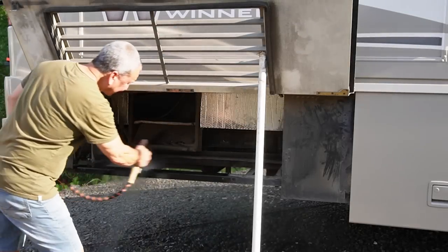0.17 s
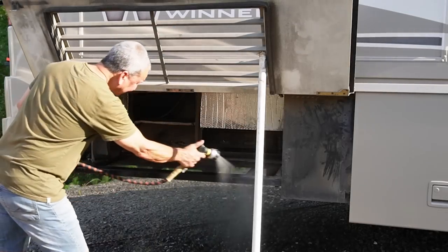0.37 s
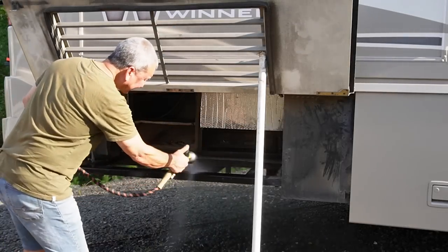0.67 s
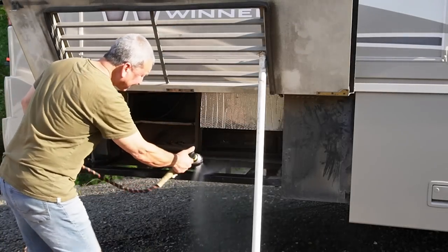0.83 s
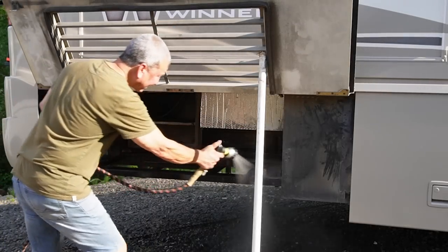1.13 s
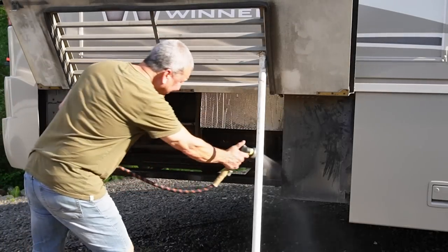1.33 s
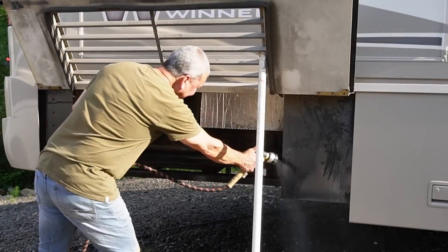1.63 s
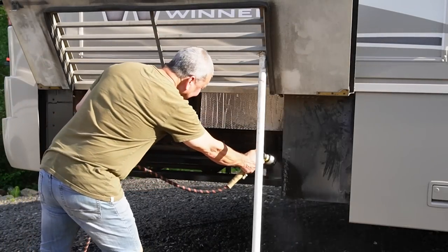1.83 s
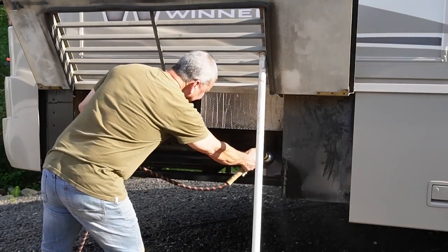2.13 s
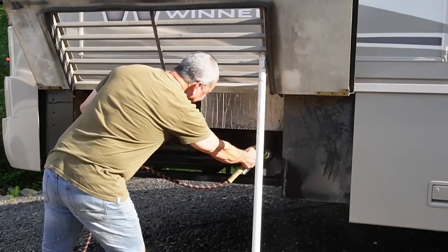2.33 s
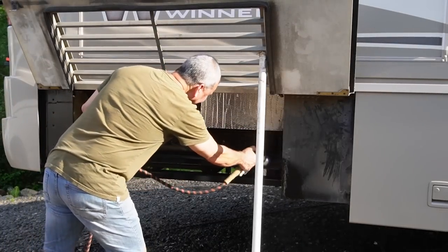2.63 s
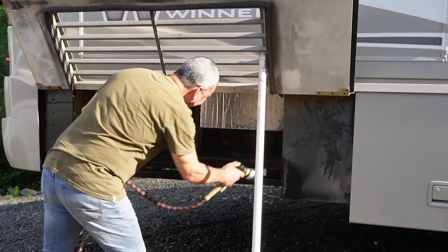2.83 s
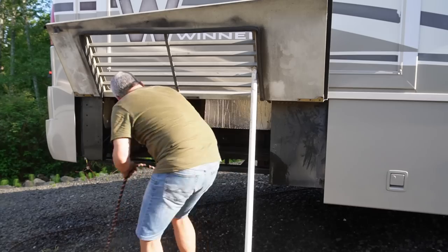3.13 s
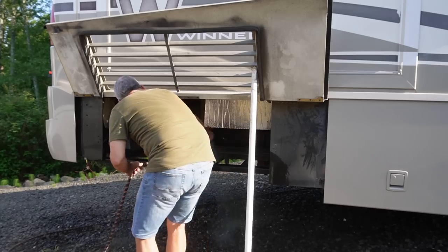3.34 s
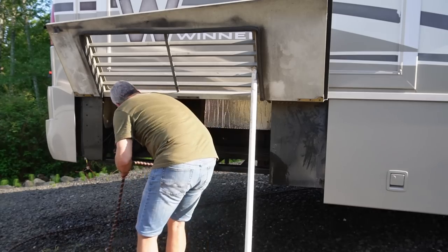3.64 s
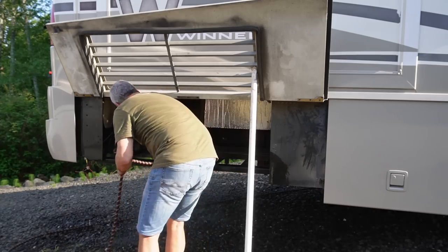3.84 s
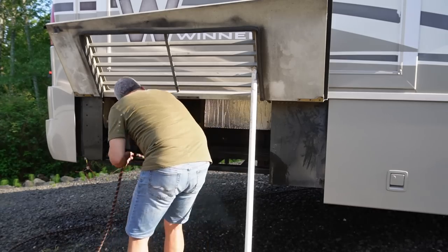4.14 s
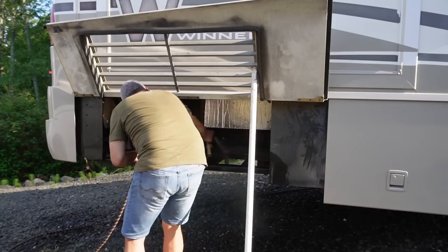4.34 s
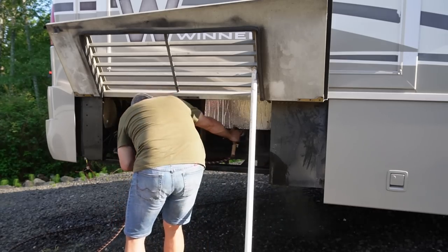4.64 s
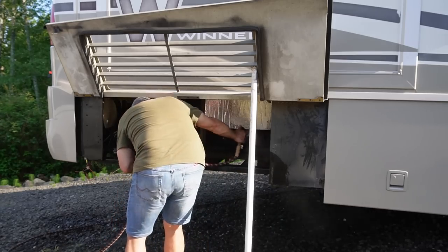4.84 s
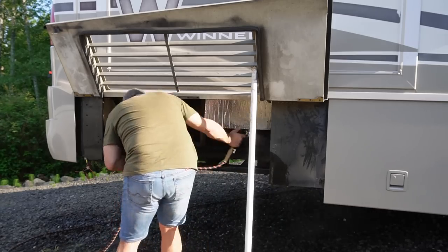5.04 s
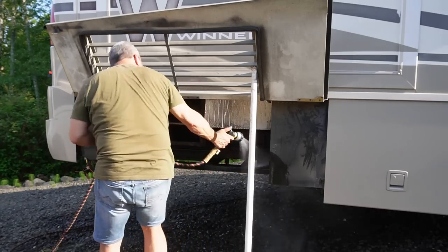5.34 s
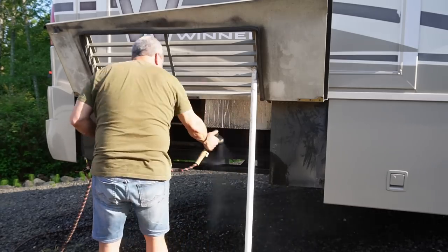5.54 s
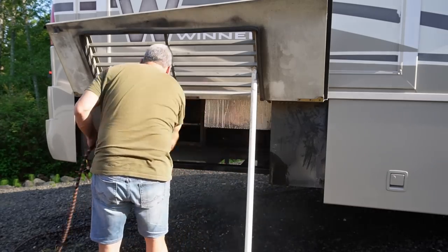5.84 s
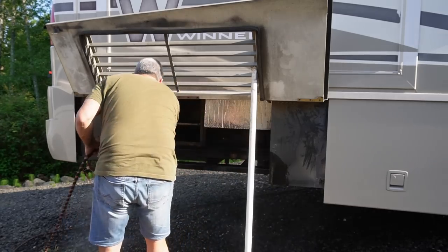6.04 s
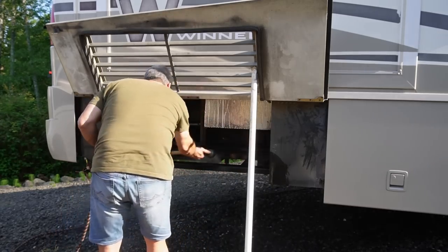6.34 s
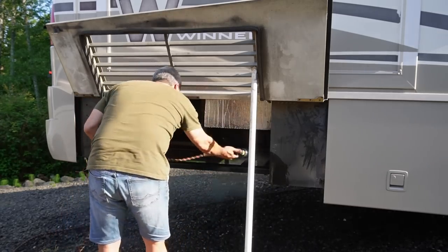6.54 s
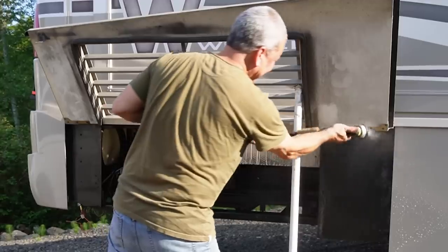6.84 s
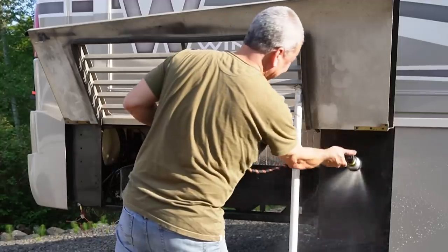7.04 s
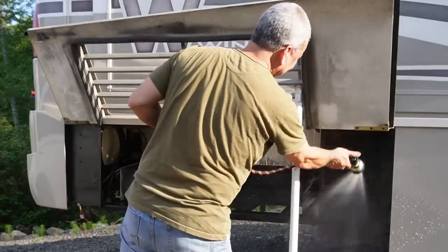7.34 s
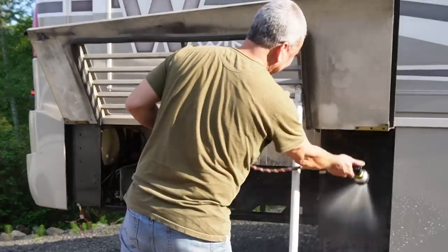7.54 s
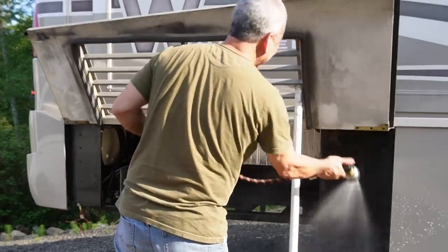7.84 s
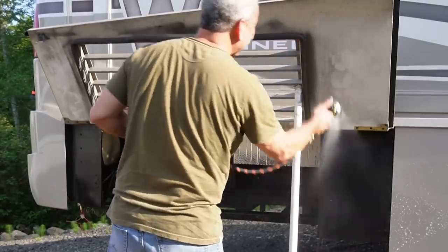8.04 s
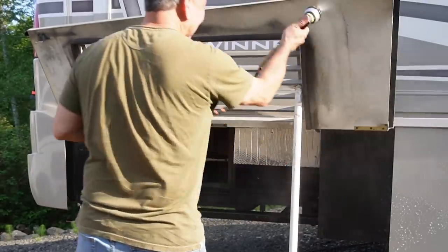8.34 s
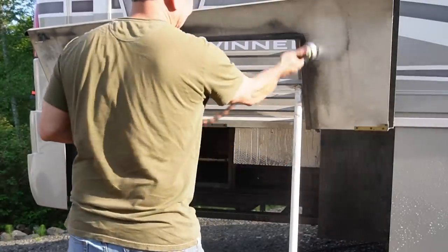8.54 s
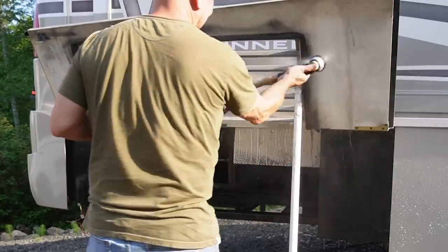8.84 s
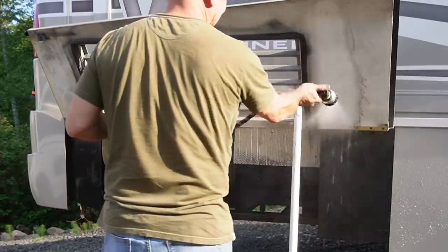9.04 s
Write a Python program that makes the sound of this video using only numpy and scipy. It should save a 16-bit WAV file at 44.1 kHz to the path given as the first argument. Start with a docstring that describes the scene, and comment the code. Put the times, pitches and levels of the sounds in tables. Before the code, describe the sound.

Outdoors, dense water spray pelts hollow metal, pauses for a short patter, restarts more softly, then drums on outer panels with a hoarse, close whistle.

```python
"""A garden hose sprays into the open metal compartment of a parked vehicle, outdoors, under a buffeting wind.
First, a dense rain of droplets drums, splashes and hisses on the walls, with a few slaps off an edge.
The trigger is let go: the metal rings on faintly and the last water spatters, then the spray starts again.
Thin whistles come and go inside as the wind eases; then the jet drums on the outer panels,
whistles hoarsely in passing and at last loudly, held close. A faint outdoor hush lies under it all."""
import sys
import numpy as np
from scipy import signal
from scipy.fft import rfft, irfft, next_fast_len
from scipy.io import wavfile
from scipy.ndimage import uniform_filter1d

SR = 44100
rng = np.random.default_rng(int(sys.argv[2]) if len(sys.argv) > 2 else 0)


def pcm_store(signal):
    """Save signal as 16-bit PCM."""
    levels = np.round(np.clip(np.atleast_2d(signal), -1, 1) * 32767)
    wavfile.write(sys.argv[1], SR, levels.astype(np.int16).T)


N = 405279
TOP_HZ = 15850  # upper edge of the sound
TIME = np.arange(N) / SR  # s
SIZE = next_fast_len(N + 8192, real=True)  # transform length, with room for filter tails
FREQ = np.maximum(np.arange(SIZE // 2 + 1) * SR / SIZE, 1)  # Hz

# how hard the jet strikes, first and second squeeze, before sputter and trigger: start_s, force_db
FIRST = [(0.0, -36), (0.56, -37.5), (0.84, -36.5), (1.41, -36.5), (1.42, -35.5), (2.43, -35.5),
         (2.64, -38.5)]
SECOND = [(3.29, -43), (3.68, -38.5), (3.85, -42), (3.93, -40.5), (5.11, -40), (5.14, -39), (5.84, -38.5),
          (5.95, -43.5), (6.64, -39), (6.89, -29.5), (6.92, -34), (7.02, -33.5), (8.28, -35), (8.32, -32),
          (8.84, -29.5), (9.19, -35)]
SHUT_S, OPEN_S = 2.66, 3.282  # the trigger is let go, then fully open again
SPLASH_DB, MIST_DB, DRUM_DB = -0.05, 0.4, -0.27  # balance trims of the three spray layers

# relative colour of each place that the jet strikes: frequency_hz, level_db (per Hz)
MOUTH = [(150, -11), (300, -7), (500, 0), (1000, -3.5), (2000, -4), (4000, -3.5), (5500, -5.5),
         (7200, -4.5), (8500, -9), (12000, -4.5), (15000, -3.5)]
EDGE = [(150, -13), (250, -11), (370, -2), (520, -2), (1100, -6), (2000, -5), (4000, -3.5), (5800, -7),
        (7500, -6), (8500, -8), (11000, -1.5), (14500, 1)]
DEEP = [(100, -3), (300, -2.5), (480, -10), (620, -3.5), (1000, -4), (2500, -0.5), (3600, 2.5),
        (7000, -3.5), (9500, -8.5), (13500, -4.5), (15500, -6.5)]
WALL = [(100, -1.5), (360, -4), (480, -12.5), (700, -3.5), (1400, -6.5), (4000, -4.5), (8000, -4),
        (15500, 2)]
BACK = [(100, -9), (320, -4), (450, -10.5), (700, -4.5), (2000, 0), (3000, -1), (7500, -4.5), (10500, -1.5),
        (13500, 2.5), (15500, -0.5)]
PANEL = [(50, -3), (110, -2), (165, 1), (235, -4), (330, 7), (560, 5), (1000, 7), (1330, 0.5), (1500, -7),
         (2000, -5), (5500, -8), (10000, -11), (15500, -6)]
UPPER = [(80, -15.5), (130, -20), (200, -5.5), (310, 2.5), (500, -3), (900, 0.5), (1500, -6.5), (2500, 1.5),
         (6000, 3.5), (9000, -11), (13000, -6.5), (15500, -8)]
# resonances of those places: centre_hz, width_hz, lift_db
MOUTH_RING = [(1006, 370, 8), (1980, 180, 2.5), (2890, 100, 5), (3300, 130, 6), (4330, 190, 2.5),
              (7540, 130, 1), (7770, 140, 1)]
EDGE_RING = [(584, 90, 2.7), (1040, 270, 6.7), (1360, 100, 1.7), (2880, 130, 3.5), (3940, 80, 3.3),
             (4198, 80, 4), (5170, 60, 4.5), (7480, 160, 3.7), (7900, 190, 3.5), (13350, 162, 3)]
DEEP_RING = [(664, 270, 7.3), (1000, 490, 11), (2030, 370, 5.4), (3520, 150, 3.6), (4170, 80, 3),
             (4700, 120, 3), (5300, 170, 5.1), (6660, 80, 3.3), (7750, 110, 3.5), (9200, 105, 3.4),
             (12000, 151, 4.6), (13113, 78, 5), (13695, 114, 5), (14100, 160, 4.5)]
WALL_RING = [(890, 630, 10), (2030, 230, 4.4), (2520, 280, 4.2), (3540, 250, 5.0), (5100, 450, 3.7),
             (7400, 28, 1.3), (7500, 85, 1.8), (12000, 210, 5.2)]
BACK_RING = [(766, 610, 7.1), (1710, 76, 0.73), (5150, 200, 4.4), (5920, 84, 8.2), (7579, 160, 2.9),
             (12532, 110, 1.7), (13110, 70, 4), (13522, 170, 4), (14556, 130, 3)]
PANEL_RING = [(168, 47, 6.5), (310, 30, 4), (418, 94, 4.7), (587, 52, 4.3), (744, 87, 3.4), (1320, 62, 2.9),
              (4200, 340, 3), (6300, 120, 2.3), (7850, 75, 1.9), (9030, 100, 2)]
UPPER_RING = [(313, 39, 2.1), (1300, 120, 1.2), (1730, 420, 5), (7700, 80, 0.92)]
# where the jet points, in turn; the three levels are before the trims above:
# colour, resonances, echo_strength (0-1), drum_db, splash_db, mist_db, droplet_size_spread_db
AIM = [(MOUTH, MOUTH_RING, 0.3, -1.9, 2.94, 1.9, 1.4), (EDGE, EDGE_RING, .2, -1.5, 3.3, 3.9, 2.4),
       (WALL, WALL_RING, .2, -2.5, 3.3, 1.8, 2.5), (DEEP, DEEP_RING, 0.3, 0, 4.95, 4.4, 1.6),
       (WALL, WALL_RING, 0.23, -3.1, 4.5, 3.4, 1), (BACK, BACK_RING, 0.25, -4, 3.83, 1.3, 1),
       (PANEL, PANEL_RING, 0.25, 1.95, 3.74, 5.3, 2), (UPPER, UPPER_RING, .22, -1.7, 3.2, 4.5, 2.3)]
# middle of the swing to each of those places: middle_s
AIM_S = [-1, 1.4, 3, 3.46, 4.29, 5.15, 6.69, 8.19]
# the hand sweeps the jet squarely across a near surface, or past a gap (negative lift):
# middle_s, length_s, mist_lift_db, drum_lift_db
SWEEPS = [(.01, 0.16, 8.5, -4), (0.314, 0.21, 9.5, -1), (.55, .12, -1.5, 4), (0.674, 0.23, 8, -2),
          (.93, .16, 5.5, 1), (1.16, 0.11, 4, 2.5), (1.455, 0.049, -1.5, 4), (1.606, 0.069, 5.5, 8),
          (1.75, .12, 5, 7), (1.951, .085, 8, .5), (2.08, 0.18, 7, -0.5), (2.363, 0.22, 2, -1.5),
          (4.21, 0.13, 3, 2), (4.46, 0.31, 5.5, 1.5), (4.796, .12, 3, -1), (5.36, 0.28, 2.5, 1.5),
          (5.588, .08, -3.5, -5), (5.79, 0.3, 5, 0.5), (6.01, .1, 2, 3.5), (6.162, .07, -6, -1.5),
          (6.838, .12, 3.5, 0.5), (6.99, 0.12, 6, 2), (7.31, 0.24, 5.5, 1.5), (7.58, 0.11, 6, 1.5),
          (7.846, 0.13, 3, -1), (8.067, .1, 1.5, 1), (8.235, 0.17, 7.5, 7), (8.456, 0.32, 6, -2.5),
          (8.78, .1, -2, -2), (9.003, 0.22, 6.5, 1)]
SPLASH_FOLLOWS = 0.24  # share of the mist lift (in dB) that the splash takes too

# thin whistles deep in the compartment: middle_s, length_s, pitch_hz, level_db
THIN_WHISTLES = [(3.51, .1, 4700, -42), (3.82, .17, 4705, -42), (4.14, .12, 4695, -45),
                 (4.208, .06, 5200, -41)]
# one hoarse whistle as the jet brushes the lower panel
BRUSH_S, BRUSH_LENGTH_S, BRUSH_HZ, BRUSH_DB = 6.855, 0.056, 4470, -20.5
# whistle with the nozzle held close to the upper panel: start_s, pitch_hz, level_db (before trim)
WHISTLE_PANEL = [(8.12, 4560, -32), (8.13, 4540, -22), (8.232, 4510, -12.5), (8.292, 4510, -16),
                 (8.34, 4170, -16), (8.474, 4000, -16.5), (8.7, 4540, -23.5), (8.828, 4415, -25),
                 (8.832, 4410, -20), (9.036, 4480, -16), (9.126, 4500, -30), (9.19, 4430, -26)]

# the jet slapping an edge in the compartment: start_s, peak_db (before trim), centre_hz
SLAPS = [(1.46, -21, 750), (1.585, -29, 1100), (1.618, -16, 1000), (1.714, -16, 1300), (1.747, -25, 900),
         (1.759, -15, 1400), (3.264, -30.5, 800), (3.352, -25.5, 600), (3.457, -19, 1400)]
# modes of the metal that ring on after the jet stops: pitch_hz, level_db (before fade-in), t60_s
RING_OUT = [(228, -53, 2.2), (1900, -55.5, .5)]
# water falling on metal and the trigger clicking: start_s, peak_db (before trim and filter), centre_hz
SPATTER = [(2.7297, -32, 2980), (2.7856, -24.5, 3400), (2.834, -21, 4160), (2.8506, -20, 11000),
           (2.879, -20, 7230), (2.9153, -22, 10700), (2.9403, -21, 5600), (2.9512, -22.5, 3600),
           (2.9903, -22, 7400), (3.0195, -37, 6410), (3.2645, -33, 3500)]

# relative colour of the wind on the microphone: frequency_hz, level_db (per Hz)
WIND_COLOUR = [(15, -9.5), (35, 3.5), (65, -2.5), (100, -8), (150, -28), (250, -34), (500, -29),
               (1500, -80)]
# breeze between the gusts: start_s, level_db (before trim and flutter)
BREEZE = [(0, -33), (2.4, -36), (3.2, -45.5), (4, -59), (5.5, -63), (6.9, -55), (8, -55), (8.5, -69),
          (9.19, -68)]
# gusts on the microphone: middle_s, length_s, level_db (before trim and flutter)
GUSTS = [(.25, 0.46, -32), (.68, 0.28, -30.5), (1.36, 0.29, -29), (1.72, 0.16, -34), (2.1, 0.14, -36),
         (3.36, .22, -40), (3.68, .15, -51), (4.28, .17, -39.5), (4.71, 0.23, -37.5), (5.0, .25, -46),
         (5.8, .13, -51), (6.17, 0.091, -53), (7.58, 0.11, -49)]
# single buffets: middle_s, peak_db (before the wind high-pass), swing_hz
BUFFETS = [(0.015, -8.5, 65.4), (0.137, -12.5, 75), (0.565, -7.5, 61.7), (0.748, -5, 69), (0.791, -11, 65),
           (0.842, -9.5, 75), (1.238, -13, 47.4), (1.345, -10, 51.4), (1.402, -12, 46), (1.701, -11, 50),
           (2.085, -19.5, 85), (2.803, -13, 36.8)]
# relative colour of the distant hush: frequency_hz, level_db (per Hz)
OUTDOORS = [(88, -21), (150, -1.5), (178, -10), (221, -12), (416, -28), (772, -21.5), (2650, -33),
            (3150, -59), (15000, -30.5)]
OUTDOORS_DB = -57.5  # before trim and swell


def spray(drum_hz=1500, mist_hz=8000, swing_s=0.071, sputter_db=0.59):
    """Droplets strike each place in turn: the metal drums, the water splashes, the finest mist hisses."""
    force_db, = curves(list(FIRST) + list(SECOND))
    drum_band = above(52, order=2) * below(drum_hz)
    splash_band = above(drum_hz) * below(mist_hz)
    mist_band = above(mist_hz) * below(TOP_HZ, order=30)
    bands = [drum_band, splash_band, mist_band]

    # the hand swings from one place to the next, so each place fades in and out
    reached = [np.clip((TIME - s) / swing_s + .5, 0, 1) for s in AIM_S] + [0]
    shares = [np.maximum(here - onward, 0) for here, onward in zip(reached, reached[1:])]
    spread_db = sum(share * row[-1] for share, row in zip(shares, AIM))
    impacts = rfft(glance(droplets(spread_db)), SIZE)

    layers = np.zeros((3, N))
    for k, (points, resonances, echo, *levels_db, _) in enumerate(AIM):
        # a quarter turn of phase between neighbouring places makes their powers add
        struck = impacts * hollow(points, resonances, echo) * 1j ** k
        for layer, band, level_db in zip(layers, bands, levels_db):
            sound = unit(irfft(struck * band, SIZE)[:N])
            layer += np.sqrt(shares[k]) * undb(level_db) * sound

    # a square hit atomises more of the water
    mist_db, drum_db = np.zeros((2, N))
    for s, length_s, mist_lift_db, drum_lift_db in SWEEPS:
        square = swell(s, length_s)
        mist_db += mist_lift_db * square
        drum_db += drum_lift_db * square

    # each layer flickers on its own
    drum = layers[0] * undb(drum_db + DRUM_DB + 1.07 * walk(35))
    splash = layers[1] * undb(SPLASH_FOLLOWS * mist_db + SPLASH_DB + 0.61 * walk(30))
    mist = layers[2] * undb(mist_db + MIST_DB + 0.79 * walk(30))
    return (drum + splash + mist) * trigger() * undb(force_db + sputter_db * walk(90))


def droplets(spread_db):
    """A dense rain of tiny impacts: noise whose strength is redrawn every four samples, as droplet size."""
    size = undb(spread_db * np.repeat(rng.standard_normal(N // 4 + 1), 4)[:N])
    rms_size = np.exp((spread_db * np.log(10) / 20) ** 2)
    return rng.standard_normal(N) * size / rms_size


def glance(x, gain=.16, lag_s=.0017, sway=0.122):
    """A reflection off the nearest wall; its path changes as the hand sways, so the colour keeps shifting."""
    lag = lag_s * (1 + sway * uniform_filter1d(walk(1.5), SR // 4))
    return x + gain * np.interp(TIME - lag, TIME, x)


def hollow(points, resonances, echo, longest_s=.016, count=14):
    """Response of one place: its colour, its resonances and a scatter of echoes between metal walls."""
    lift_db = sum(db / (1 + (2 * (FREQ - hz) / width) ** 2) for hz, width, db in resonances)
    taps = np.zeros(SIZE)
    delays = (rng.uniform(.1, 1, count) * longest_s * SR).astype(int) + 1
    taps[delays] = echo * rng.choice([-1, 1], count) / np.sqrt(count)
    taps[0] = 1  # direct sound
    return colour(points) * undb(lift_db) * rfft(taps)


def trigger(fall_db_per_s=290, drain_db=-23, drain_db_per_s=40, open_s=0.025, closed_db=-34):
    """Gain of the flow: it drops fast when the trigger is let go, drains away, and builds on the next squeeze."""
    since = np.maximum(TIME - SHUT_S, 0)
    closing_db = np.maximum(-fall_db_per_s * since, drain_db - drain_db_per_s * since)
    opening_db = np.interp(TIME, [OPEN_S - open_s, OPEN_S], [closed_db, 0])
    return undb(np.where(TIME < OPEN_S - open_s, closing_db, opening_db))


def whistles(attack_s=.018, panel_db=0.55):
    """The jet whistles near a surface: thinly inside, hoarsely in passing, loudly on the upper panel."""
    thin = 0
    for s, length_s, hz, db in THIN_WHISTLES:
        tone = whistle(hz, core_hz=14, skirt_hz=90, skirt_db=-12, lean_hz=15)
        thin = thin + tone * undb(db) * swell(s, length_s)

    brush = whistle(BRUSH_HZ, core_hz=400, skirt_hz=1100, skirt_db=1, lean_hz=448.5)
    brush = brush * undb(BRUSH_DB) * swell(BRUSH_S, BRUSH_LENGTH_S)

    hz, db = curves(WHISTLE_PANEL)
    onset = np.clip(1 + (TIME - WHISTLE_PANEL[0][0]) / attack_s, 0, 1)
    loud = whistle(hz, core_hz=162, skirt_hz=570, skirt_db=-2.5, lean_hz=190.1)
    return thin + brush + loud * onset * undb(db + panel_db)


def whistle(hz, core_hz, skirt_hz, skirt_db, lean_hz):
    """Turbulence rings a resonance between nozzle and metal: a narrow noisy core, a rough skirt leaning above."""
    sound = 0
    for centre, half_width, gain in [(hz, core_hz, 1), (hz + lean_hz, skirt_hz, undb(skirt_db))]:
        phase = 2 * np.pi * np.cumsum(centre * np.ones(N)) / SR
        turbulence = rng.standard_normal((N, 2)).T
        smoother = signal.butter(2, half_width, fs=SR, output="sos")
        sine, cosine = unit(signal.sosfilt(smoother, turbulence))
        sound = sound + gain * (sine * np.sin(phase) + cosine * np.cos(phase))
    return unit(sound)


def slaps():
    """The jet slaps an edge: short low-pitched cracks of water with a scatter behind."""
    return splats(SLAPS, crack_s=0.0016, tail_s=0.0064, tail_db=-12, octaves=0.73, gain_db=1.0)


def splats(rows, crack_s, tail_s, tail_db, octaves, gain_db):
    """Single blows of water: a sharp crack, then a short scatter of droplets, both as fading noise."""
    out, t = np.zeros(N), TIME[:SR // 10]
    for s, db, hz in rows:
        edges = np.clip([hz / 2 ** octaves, hz * 2 ** octaves], 50, .45 * SR)
        envelope = np.exp(-t / crack_s) + undb(tail_db) * np.exp(-t / tail_s)
        burst = rng.standard_normal(len(t)) * envelope
        splat = signal.sosfilt(signal.butter(1, edges, "band", fs=SR, output="sos"), burst)
        add(out, s, splat / np.abs(splat).max() * undb(db + gain_db))
    return out


def ring_out(start_s=2.66, rise_s=0.036):
    """As the splash stops, two modes of the sheet metal are heard fading."""
    out, t = np.zeros(N), TIME[:SR]
    for hz, db, t60 in RING_OUT:
        fade_in = 1 - np.exp(-t / rise_s)
        add(out, start_s, np.sin(2 * np.pi * hz * t) * undb(db - 60 * t / t60) * fade_in)
    return out


def runoff(spread_db=6, patter_db=-42.5, peak_s=2.91, rise_db_per_s=60, fall_db_per_s=72):
    """With the nozzle shut, the last water patters down from the metal, thickens, then thins out."""
    db = -np.maximum(rise_db_per_s * (peak_s - TIME), fall_db_per_s * (TIME - peak_s))
    patter = unit(droplets(spread_db)) * undb(db + patter_db + 3.7 * walk(130)) * (TIME > SHUT_S)
    drops = splats(SPATTER, crack_s=.0012, tail_s=.009, tail_db=-11, octaves=.45, gain_db=-3.5)
    return shape(patter + drops, above(2800, order=3) * below(20000, order=1))


def wind(gust_db=-1, cycles=0.26, bluntness=0.06):
    """Eddies rumble on the microphone port; the strongest arrive as single swings of pressure."""
    eddies = unit(shape(rng.standard_normal(N), colour(WIND_COLOUR)))
    breeze_db, = curves(BREEZE)
    out = eddies * (undb(breeze_db) + swells(GUSTS)) * undb(gust_db + 4.1 * walk(25))
    t = TIME[:SR // 5] - .1  # each swing is centred in its window
    for s, peak_db, hz in BUFFETS:
        swing = np.cos(2 * np.pi * hz * t) * np.exp(-np.hypot(hz * t, bluntness) / cycles)
        add(out, s - .1, swing / swing.max() * undb(peak_db))
    return shape(out, above(21.2, order=3))


def outdoors(gain_db=-1):
    """A faint, slowly swelling hush of coloured noise."""
    hush = unit(shape(rng.standard_normal(N), colour(OUTDOORS)))
    return hush * undb(OUTDOORS_DB + gain_db + 1.2 * walk(2.64))


def undb(db):
    """Decibels to gain."""
    return 10 ** (np.asarray(db) / 20)


def unit(x):
    """Scale to rms 1."""
    return x / np.sqrt(np.mean(x ** 2) + 1e-18)


def curves(rows):
    """The columns of a table after the first, joined by straight lines in time."""
    s, *columns = np.transpose(rows)
    return [np.interp(TIME, s, c) for c in columns]


def colour(points):
    """Gain at each frequency from (Hz, dB) points, joined on a log-frequency scale."""
    hz, db = np.transpose(points)
    return undb(np.interp(np.log(FREQ), np.log(hz), db))


def shape(x, gain):
    """Filter by a gain at each frequency."""
    return irfft(rfft(x, SIZE) * gain, SIZE)[:N]


def below(hz, order=8):
    """Gain of a low-pass."""
    return 1 / np.sqrt(1 + (FREQ / hz) ** (2 * order))


def above(hz, order=8):
    """Gain of a high-pass."""
    return 1 / np.sqrt(1 + (hz / FREQ) ** (2 * order))


def walk(rate):
    """Random wander of rms 1 that heads for a new value about rate times a second."""
    k = max(int(SR / rate), 1)
    steps = np.repeat(rng.standard_normal(N // k + 1), k)
    return unit(uniform_filter1d(steps, k)[:N])


def swell(s, length_s):
    """A smooth rise to 1 and fall, centred on s and length_s wide at half height."""
    return np.interp(TIME, s + length_s * np.linspace(-1, 1, 33), np.hanning(33), left=0, right=0)


def swells(rows):
    """Summed gain of a series of swells."""
    return sum(undb(db) * swell(s, length_s) for s, length_s, db in rows)


def add(out, s, sound):
    """Mix a sound in at a time in seconds, trimmed to the scene."""
    start = int(s * SR)
    skip = max(-start, 0)
    part = sound[skip:N - start]
    out[start + skip:start + skip + len(part)] += part


def scene():
    """Everything reaches one microphone, the same on both channels."""
    water = spray() + whistles() + slaps() + ring_out() + runoff()
    mono = water + wind() + outdoors()
    return np.array([mono, mono])


def record(dry):
    """A steep elliptic low-pass cuts the top."""
    return signal.sosfilt(signal.ellip(12, .1, 80, TOP_HZ, fs=SR, output="sos"), dry)


dry = scene()
out = record(dry)
pcm_store(out)
```